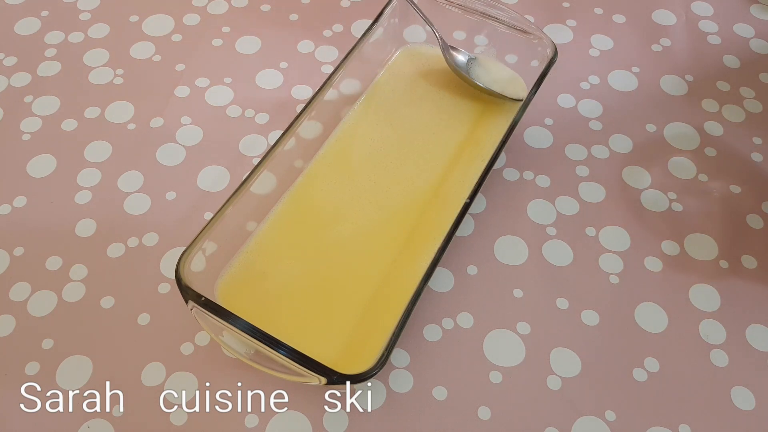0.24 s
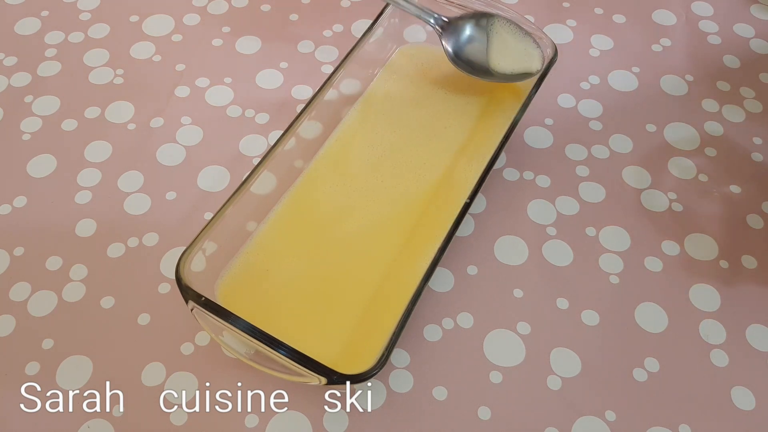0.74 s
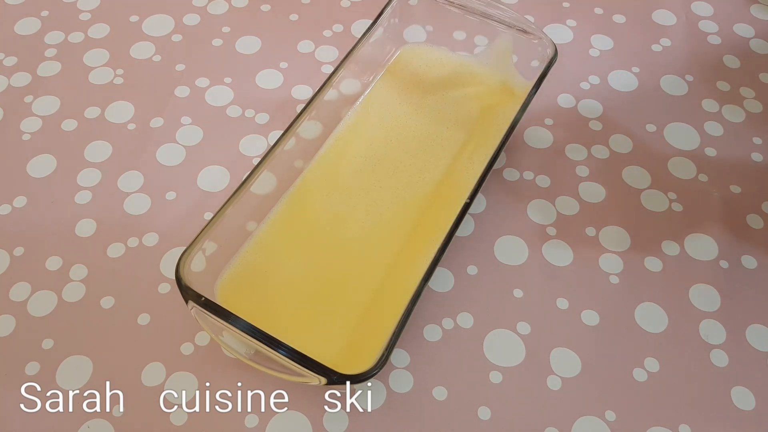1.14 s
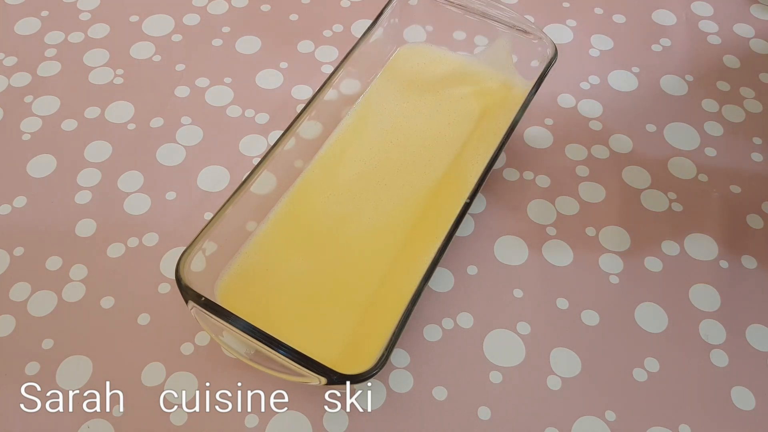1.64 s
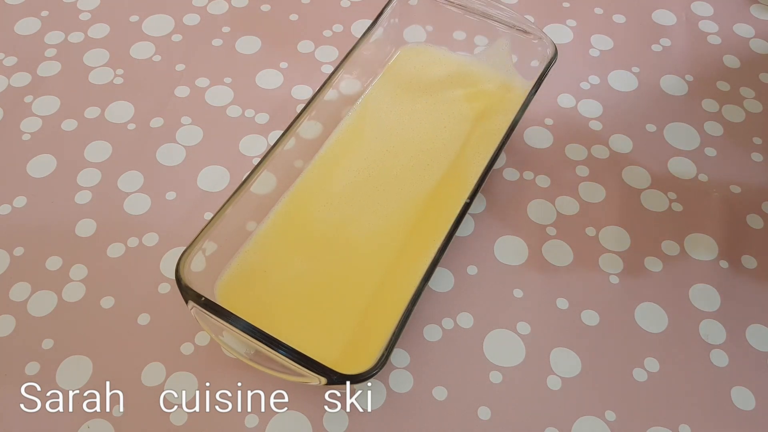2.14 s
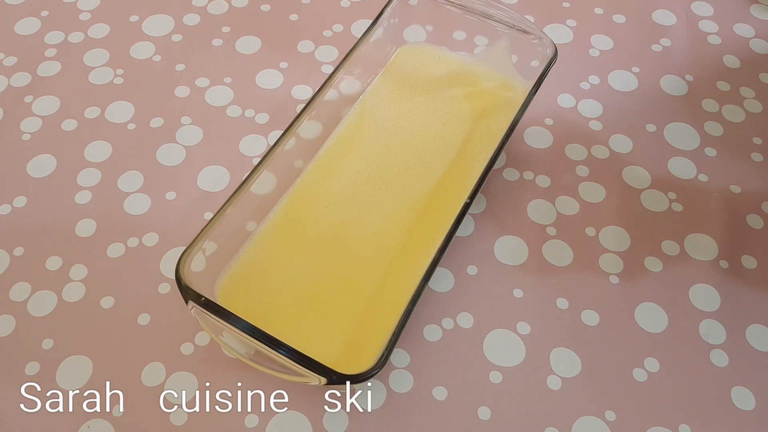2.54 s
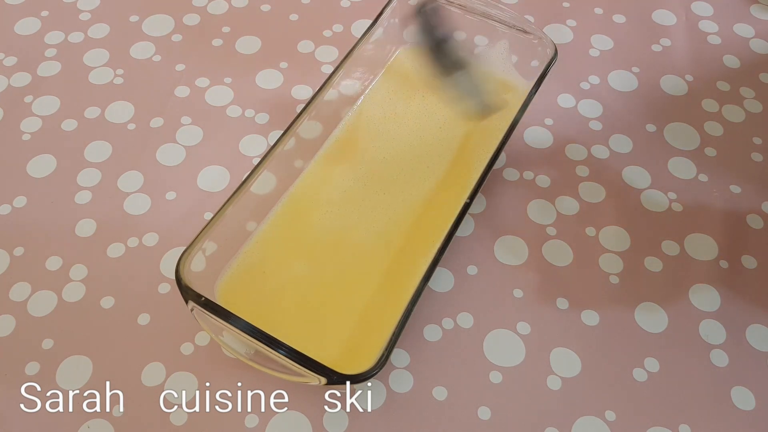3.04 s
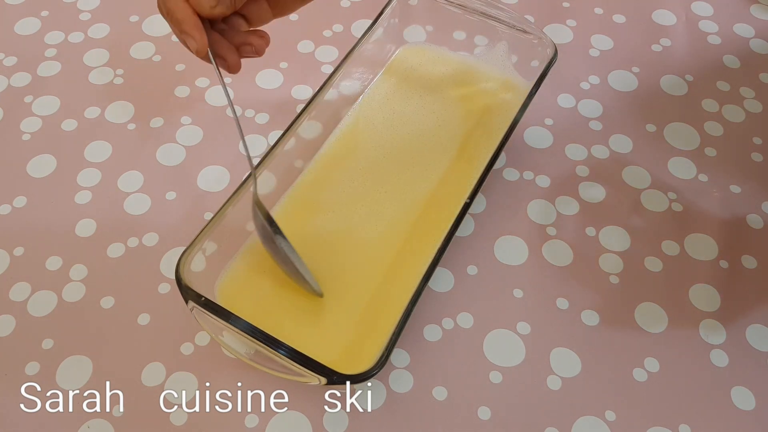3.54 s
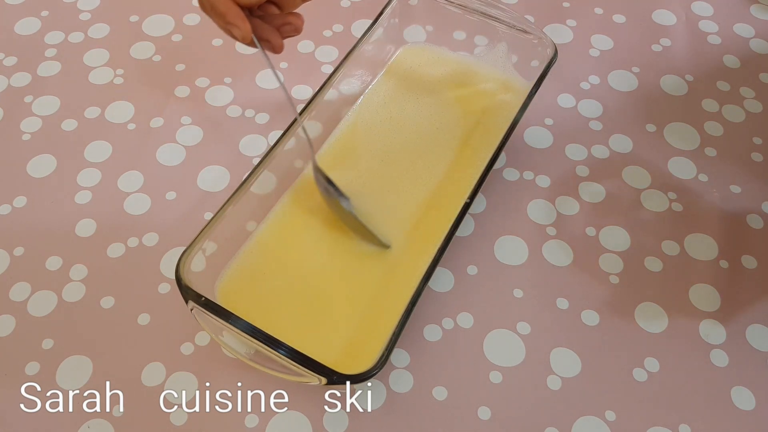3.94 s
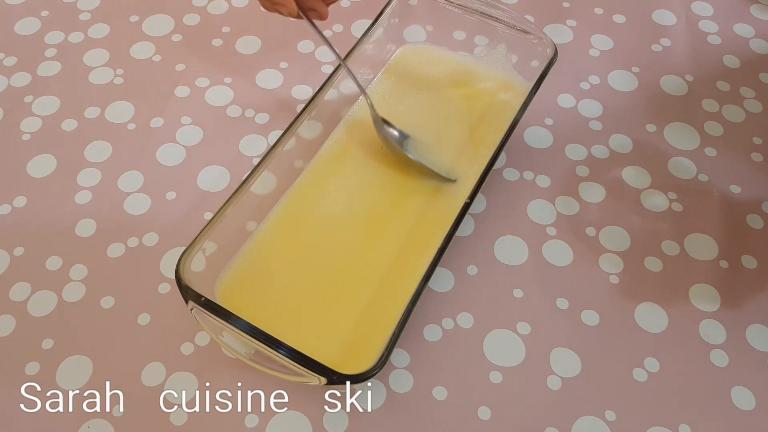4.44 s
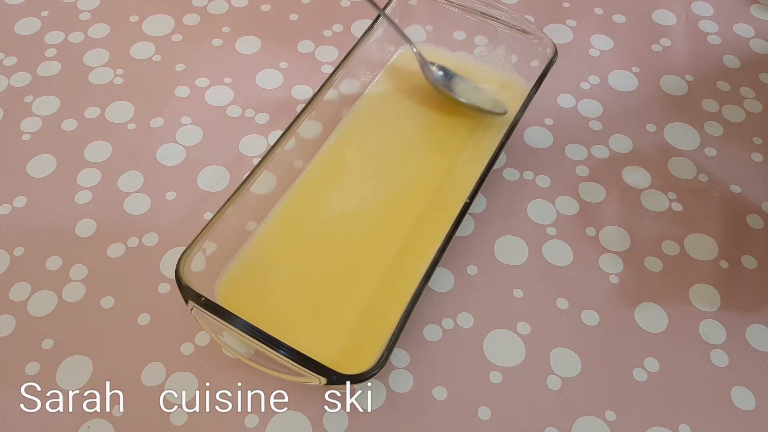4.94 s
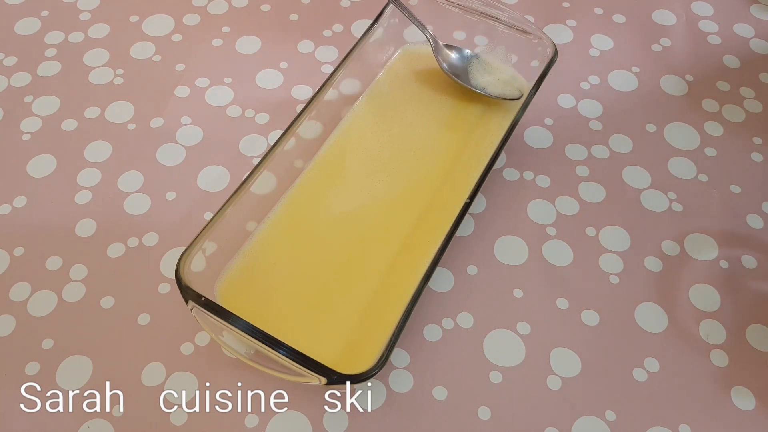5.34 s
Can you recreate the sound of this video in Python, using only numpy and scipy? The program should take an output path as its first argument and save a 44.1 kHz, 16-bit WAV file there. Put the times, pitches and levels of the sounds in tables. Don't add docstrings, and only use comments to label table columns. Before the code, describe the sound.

In a humming kitchen, short dull glass knocks, three bright ringing spoon taps, distant chirps, a faint scrape and final dish knocks.

```python
import sys
import numpy as np
from scipy import signal
from scipy.io import wavfile
from scipy.ndimage import uniform_filter1d

SR = 44100
rng = np.random.default_rng(int(sys.argv[2]) if len(sys.argv) > 2 else 0)


def put_to_file(sound):
    columns = np.atleast_2d(sound).T
    safe = np.clip(columns, -1, 1)
    whole_steps = np.round(safe * 32767)
    wavfile.write(sys.argv[1], SR, whole_steps.astype(np.int16))


def level_to_linear(level):
    exponent = np.asarray(level, float) / 20
    return 10 ** exponent


N = 245895

# t/s, blow level/dB, hardness/(dB per octave), crack level/dB, place (0 rim, 1 wall)
DISH_KNOCKS = [
    (0.0878, -20.5, -.5, -11, .05),
    (0.1428, -26.5, -2.5, -16, .05),
    (0.2798, -14.5, 3, -2.5, 0.61),
    (.344, -25.5, -1, -6, 0.34),
    (0.4264, -24, -3.5, -10, 0.32),
    (5.2545, -14.5, 0., -5, 0.56),
    (5.2778, -16, -.5, -6, 1),
    (5.5269, -12, -0.1, -7.5, 0.057),
]


def evened(x):
    return x / np.sqrt(np.mean(x ** 2) + 1e-20)


def read(points, hz):
    f, value = np.transpose(points)
    return np.interp(np.log(hz + 1), np.log(f + 1), value)


def add(mix, s, sound):
    part = mix[..., round(s * SR):][..., :sound.shape[-1]]
    part += sound[..., :part.shape[-1]]


def noise(gain, patchy_db, size=2048):
    # f/Hz, likeness (1 same, 0 unrelated)
    likeness = [(60, .98), (130, .97), (290, .86), (640, .4), (1400, -.1), (3000, 0), (15000, 0)]
    # f/Hz, left over right/dB
    balance = [(60, 5.5), (180, -0.5), (550, 4), (1650, 2.5), (4970, 1), (15000, 2.5)]
    frames, hz = 4 * N // size + 5, np.fft.rfftfreq(size, 1 / SR)
    a, b, c, d, patches = rng.standard_normal((frames, len(hz), 5)).T
    patches = uniform_filter1d(patches, size=12, axis=0)
    patches = evened(uniform_filter1d(patches, size=8, axis=1))
    same = np.clip(read(likeness, hz), -1, 1)[:, None]
    left = a + 1j * b
    right = same * left + np.sqrt(1 - same ** 2) * (c + 1j * d)
    right = right * level_to_linear(-read(balance, hz))[:, None]
    heard = gain(hz) * (hz < 14450)
    z = np.array([left, right]) * heard[:, None] * level_to_linear(patchy_db * patches)
    return evened(signal.istft(z, nperseg=size, noverlap=3 * size // 4)[1][:, :N])


def reverb(x, stretch, rise_s):
    # f/Hz, time to fall 60 dB/s
    kitchen = [(500, 0.74), (1500, 0.56), (4000, 0.49), (9000, 0.41), (15000, 0.11)]
    hz, t, z = signal.stft(rng.standard_normal((2, SR)), SR, nperseg=128)
    fall = level_to_linear(-60 * t / (stretch * read(kitchen, hz)[:, None]))
    tail = signal.istft(z * fall, SR, nperseg=128)[1][:, :SR]
    tail = tail * (1 - np.exp(-np.arange(SR) / (rise_s * SR)))
    return signal.fftconvolve(x[None], tail / np.linalg.norm(tail[0]), axes=1)[:, :N]


def wavering(hz, waver_hz):
    drift = evened(uniform_filter1d(rng.standard_normal(N), size=3000))
    return np.sqrt(2) * np.sin(2 * np.pi * np.cumsum(hz + waver_hz * drift) / SR)


def wander():
    return evened(uniform_filter1d(uniform_filter1d(rng.standard_normal(N), size=3000), size=3000))


def duck():
    start_s, depth_db = 2.473, -9.5
    fall_s, hold_s, recover_s = .25, .6, 0.97
    turns_s = start_s + np.cumsum([0, fall_s, hold_s, recover_s])
    return level_to_linear(depth_db * np.interp(np.arange(N) / SR, turns_s, [0, 1, 1, 0]))


def swells(rows, rest_db):
    t = np.arange(N) / SR
    bells = sum(level_to_linear(db) * np.exp(-((t - s) / width_s) ** 2) for s, width_s, db in rows)
    return level_to_linear(rest_db) * duck() + bells


def room_noise():
    # f/Hz, level/dB
    tone_colour = [(38, -23), (62, -11.5), (95, -6), (125, -8.5), (200, -2.5), (330, -9), (560, -7),
                   (680, -17.5), (850, -22.5), (1500, -28.5), (2500, -38.5), (6000, -42), (9000, -40.5),
                   (15500, -44)]
    return noise(lambda hz: level_to_linear(read(tone_colour, hz)), patchy_db=1, size=4096)


def appliance_hum():
    # f/Hz, level against the room noise/dB, waver/Hz, throb/dB
    hum_tones = [(154.9, -5, 3, 1), (202.8, -11, 2.9, 2), (226, -9.5, 3, 5), (295.4, -12, 3.2, 2.5),
                 (466.3, -14.5, 4, 0.5), (567, -20, 5, 6.5)]
    hum = np.zeros(N)
    for hz, db, waver_hz, throb_db in hum_tones:
        throb = evened(uniform_filter1d(rng.standard_normal(N), size=3000))
        hum += level_to_linear(db - 1 + throb_db * throb) * wavering(hz, waver_hz)
    return hum


def street_rumble():
    # centre t/s, half width/s, level/dB
    rumble_swells = [
        (.46, .05, -57),
        (.84, .12, -64),
        (1.33, .12, -57.5),
        (1.75, .15, -56.5),
        (2.1, .24, -46),
        (2.65, .1, -61),
        (3.2, .15, -65),
        (4.75, .45, -57),
        (5.4, .15, -59),
    ]
    # centre t/s, half width/s, level/dB
    mode_swells = [
        (.2, 0.18, -58),
        (.85, .1, -58.5),
        (1.6, .12, -55),
        (1.95, 0.11, -54),
        (3.35, .1, -62.5),
        (4., 0.21, -59),
        (4.95, .2, -58),
    ]
    rumble_db, rumble_throb_db, mode_db, mode_throb_db = -67, 3.5, -64, 2.
    mode = swells(mode_swells, mode_db) * level_to_linear(mode_throb_db * wander()) * wavering(94.5, 1.5)
    throb = level_to_linear(rumble_db + rumble_throb_db * wander()) * duck()
    rumble = (throb + swells(rumble_swells, -200)) * wavering(42.5, 1.5)
    return rumble + mode


def room_tone():
    tone_db, mains_db = -50.5, -58.5
    mains = level_to_linear(mains_db) * wavering(100, .1)
    humming = level_to_linear(tone_db) * appliance_hum() + mains
    steady = level_to_linear(tone_db) * room_noise() + humming * level_to_linear([[.9], [-.9]])
    return duck() * steady + street_rumble() * level_to_linear([[1.], [-1.]])


def glides():
    # t/s, length/s, start f/Hz, end f/Hz, level/dB
    chirps = [(0.019, 0.09, 4180, 3500, -67), (.51, 0.17, 5980, 6420, -61), (0.617, 0.15, 6210, 3780, -59),
              (0.799, 0.081, 5660, 4020, -63.5), (1.101, 0.12, 5970, 3330, -63.5),
              (1.484, 0.033, 2800, 3640, -57.5), (1.517, 0.031, 3637, 3620, -51),
              (1.62, 0.17, 3026, 2860, -68.5), (3.002, 0.24, 5160, 3990, -68.5),
              (3.569, .15, 8900, 7700, -73), (3.8, 0.034, 5550, 5630, -68), (3.879, .12, 5060, 3950, -68.5),
              (5.43, 0.074, 5000, 3350, -51.5)]
    # t/s, top f/Hz, knee f/Hz, drop level/dB, tail level/dB
    cheeps = [
        (1.877, 6250, 3896, -50, -50.5),
        (3.171, 6150, 3450, -57.5, -63),
        (3.54, 5670, 3400, -58, -58),
        (4.862, 5460, 3748, -52.5, -54),
    ]
    drop_s, tail_s, overlap_s, tail_end_hz = .038, .085, .006, 2880
    glide_bend, drop_bend, tail_bend = 1.1, 1.8, 1.2
    rows = [(*row, glide_bend) for row in chirps]
    for s, top_hz, knee_hz, drop_db, tail_db in cheeps:
        tail_at_s = s + drop_s - overlap_s
        rows.append((s, drop_s, top_hz, knee_hz, drop_db, drop_bend))
        rows.append((tail_at_s, tail_s, knee_hz, tail_end_hz, tail_db, tail_bend))
    return sorted(rows)


def sparrows():
    # centre t/s, half width/s, level/dB
    flurries = [
        (.5, .5, -60.5),
        (1.1, .2, -73),
        (2.75, .2, -70),
        (3.45, .3, -69),
        (4.5, 0.19, -66.5),
        (5.6, 0.37, -54.5),
    ]
    dry = np.zeros(N)
    for s, length_s, start_hz, end_hz, db, bend in glides():
        u = np.linspace(0, 1, round(length_s * SR))
        burr = .045 * evened(uniform_filter1d(rng.standard_normal(SR // 3), size=40))[:len(u)]
        pitch_hz = (end_hz + (start_hz - end_hz) * (1 - u) ** bend) * (1 + burr)
        turns = np.cumsum(pitch_hz) / SR
        voice = np.sin(2 * np.pi * turns) + level_to_linear(-22.5) * np.sin(4 * np.pi * turns)
        add(dry, s, level_to_linear(db + 2.3 * u) * voice * signal.windows.tukey(len(u), .3))
    blur = noise(lambda hz: np.exp(-(np.log2((hz + 1) / 4100) / .45) ** 2), patchy_db=2, size=1024)
    yard = level_to_linear([[3.], [1.5]]) * reverb(dry, 1.5, .012)
    return level_to_linear(-14) * dry + yard + swells(flurries, rest_db=-71) * blur


def bumps(peaks, hz):
    return sum(level_to_linear(db) / (1 + (2 * (hz - f) / width) ** 2) for f, width, db in peaks)


def stroke_gain(row):
    s, attack_s, hold_s, db, fall_db = row
    t = np.arange(N) / SR - s
    rise = 25 * np.clip(1 - t / attack_s, 0, 5)
    return level_to_linear(db - rise - fall_db * np.maximum(t - attack_s - hold_s, 0))


def metal_scrape():
    # t/s, attack/s, hold/s, peak level/dB, release/(dB per s)
    stroke = (4.27, .11, .15, -56.5, 75)
    # f/Hz, width/Hz, level/dB
    ring_peaks = [(2590, 30, -5), (3240, 39, -5), (3720, 32, -2), (3924, 22.4, 4.5), (4314, 30, -1),
                  (5140, 28, -3), (5900, 22, -7), (6020, 18, 7), (6560, 36, 0), (7130, 43, -16),
                  (7840, 21, -1), (7700, 20, -7), (7960, 26, -16), (8920, 20, -1), (8920, 28, -20),
                  (9650, 28, -1.5), (10200, 24, -1), (10800, 48, -24), (11100, 22, 1.5), (11600, 36, -7),
                  (12100, 20, -4), (12400, 29, -17.5), (12900, 32, -11), (13440, 180, -22),
                  (13700, 21, -24), (14200, 35, -20)]
    # f/Hz, level/dB
    hiss = [(590, -39), (1000, -5), (1220, -6.5), (2490, 7.5), (2940, -12), (3800, -8.5), (5550, -5),
            (6490, -17), (7250, -6), (7750, -9), (8380, -9), (11300, -18), (14300, -24)]
    ringing = noise(lambda hz: level_to_linear(read(hiss, hz) - 9.) + bumps(ring_peaks, hz), patchy_db=1)
    return level_to_linear(4.0) * stroke_gain(stroke) * ringing


def spoon_slide():
    # t/s, attack/s, hold/s, peak level/dB, release/(dB per s)
    stroke = (5.11, .125, .005, -54, 360)
    # f/Hz, level/dB
    hiss = [(600, -8), (1200, -4), (3000, -2.5), (7000, -7), (12000, -14), (14500, -18)]
    return stroke_gain(stroke) * noise(lambda hz: level_to_linear(read(hiss, hz)), patchy_db=1, size=512)


def table_thuds():
    thud_db, thud_hz, thud_t60_s = -33, 450, .09
    out, t = np.zeros(N), np.arange(SR // 8) / SR
    note = np.sin(2 * np.pi * thud_hz * t) * np.minimum(t / 0.0043, 1)
    for s, db, _, _, place in DISH_KNOCKS:
        strength_db = thud_db + 2 * (db + 12) - 10 * place
        add(out, s, level_to_linear(strength_db - 60 * t / thud_t60_s) * note)
    return out


def crack_filter(crack, hard_db):
    hz = np.fft.rfftfreq(1024, 1 / SR)
    gain_db = read(crack, hz) + hard_db * np.log2((hz + 50) / 2500)
    log_gain = np.log(level_to_linear(np.maximum(gain_db, -80)))
    full = np.r_[log_gain, log_gain[-2:0:-1]]
    return np.fft.ifft(np.exp(full - 1j * signal.hilbert(full).imag)).real[:512]


def knock(row, modes, crack, left_late_s, ring_lead_s, longest_s, crack_db, clatter):
    s, db, pan_db, hard_db, snap_db, place = row
    lead_s, widest_db = .001, 7
    late_s = np.array([[max(left_late_s, 0)], [max(-left_late_s, 0)]])
    t = np.arange(SR // 4) / SR - late_s - lead_s
    rung = t + np.array([[ring_lead_s], [0]])
    ring = np.zeros(t.shape)
    for hz, (rim_db, wall_db, t60) in zip(*modes):
        mode_db = rim_db + np.clip(place, 0, 1) * (wall_db - rim_db)
        place_db = 1.5 * rng.standard_normal((2, 1))
        tilt_db = hard_db * np.log2(hz / 2500)
        fall_db = 60 * abs(t) / min(t60, longest_s)
        ring += level_to_linear(mode_db + place_db + tilt_db - fall_db) * np.sin(2 * np.pi * hz * rung)
    colour = crack_filter(crack, hard_db)
    fade = sum(level_to_linear(level_db - 60 * abs(t) / t60) for level_db, t60 in clatter) * (t > 0)
    pulse = np.sinc(t * SR) * np.exp(-(t * SR / 6) ** 2)
    contact = fade * rng.standard_normal(t.shape) - pulse
    snap = signal.oaconvolve(contact, colour[None])[:, :t.shape[1]]
    sound = ring * (t > 0) / 2 + level_to_linear(crack_db + snap_db) * snap / abs(colour).max()
    sides = level_to_linear(db + np.array([[.5], [-.5]]) * np.clip(pan_db, -widest_db, widest_db))
    return s - lead_s, sides * sound


def cup_taps():
    # t/s, blow level/dB, bounce delay/s, bounce level/dB
    taps = [
        (2.2261, -18, .0259, -24.5),
        (2.3698, -18.5, .0248, -21.5),
        (2.5333, -20, .0237, -28),
    ]
    pitches = [1816, 1878, 1920, 1950, 2573, 2880, 3397, 3697, 4802, 4914, 5108, 5274, 5417, 6110, 8070,
               8452, 8640, 8778, 9900, 10290, 10430, 10750, 12500, 13400, 13660, 13900, 14180]
    # level/dB, time to fall 60 dB/s
    rings = [(-29.5, .1), (-7, 0.25), (-6.5, 0.2), (-23, .15), (-20.5, .04), (-20, .04), (-11.5, .03),
             (-20, .04), (-14.5, .1), (-16, 0.062), (-15, .08), (-10.5, .12), (-15, 0.066), (-15.5, .03),
             (-23.5, .08), (-21, .08), (-17, .08), (-6, .09), (-21.5, .08), (-18.5, 0.035), (-10, 0.086),
             (-19, 0.14), (-23, .05), (-17, .09), (-16, .11), (-17.5, .11), (-18.5, .11)]
    # f/Hz, level/dB
    crack = [(400, -16), (1400, -26), (2300, -6.5), (3450, -1), (4500, -11), (5000, -.5), (6300, -7),
             (7000, -17.5), (7500, -35.5), (8700, 3.5), (9500, -24), (10400, -16), (11500, -44.5),
             (15500, -45.5)]
    pan_db, tap_hard_db, tap_crack_db = -1.5, 0.3, 2.5
    bounce_hard_db, bounce_crack_db, bounce_crack_slope = -1.5, -9., 1.
    usual_bounce_db = np.mean(taps, axis=0)[3]
    contacts = []
    for s, db, after_s, bounce_db in taps:
        snap_db = bounce_crack_db + bounce_crack_slope * (bounce_db - usual_bounce_db)
        contacts.append((s, db, pan_db, tap_hard_db, tap_crack_db, 0))
        contacts.append((s + after_s, bounce_db, pan_db, bounce_hard_db, snap_db, 1))
    modes = [(db, db + 4.7 * (hz < 2000), t60) for hz, (db, t60) in zip(pitches, rings)]
    cup = np.zeros((2, N))
    for row in contacts:
        add(cup, *knock(row, (pitches, modes), crack, left_late_s=.0003, ring_lead_s=.00024, longest_s=.3,
                        crack_db=13.5, clatter=[(-27, .008), (-29, .06)]))
    return cup


def dish_knocks():
    # t/s, blow level/dB, hardness/(dB per octave), crack level/dB
    ticks = [
        (.83, -54.5, -4, -15),
        (.93, -54, 9, 1),
        (1.468, -67, 6.5, 3),
    ]
    pitches = [872, 903, 1305, 1547, 1564, 1928, 1955, 2006, 2043, 2172, 2212, 2308, 2343, 2376, 2447, 2635,
               3090, 3133, 3340, 3555, 4221, 5023, 5555, 10250, 14090]
    # level struck at the rim/dB, level struck on the wall/dB, time to fall 60 dB/s
    rings = [(-23, -25, 0.27), (-16.5, -16, 0.25), (-21, -16.5, .06), (-6, -11.5, 0.2), (-3, -7.5, .11),
             (-19.5, -19, .1), (-17, -13, 0.14), (-13, -12.5, 0.18), (-14.5, -6, 0.13), (-22.5, -9, 0.1001),
             (-20.5, -26, 0.075), (-20.5, -15, 0.29), (-9, 1, 0.1), (-18, -17, 0.14), (-27.5, -18.5, .08),
             (-28.5, -19.5, 0.0602), (-13.5, -13.5, 0.091), (-18.5, -17, 0.1), (-28.5, -15.5, .06),
             (-23, -9, .06), (-11.5, -17, 0.078), (-18.5, -12.5, 0.06), (-21.5, -17, .06),
             (-37, -20.5, .04), (-40, -35, 0.1)]
    # f/Hz, level/dB
    crack = [(400, -18), (900, -18), (1400, -6.5), (2200, 8.5), (3400, 5.5), (5000, -3.5), (6500, -2.5),
             (8000, -18), (11000, -23), (15400, -54)]
    rim_pan_db, wall_pan_db = 7., -2.5
    contacts = [(s, db, rim_pan_db + wall_pan_db * place, hard_db, snap_db, place)
                for s, db, hard_db, snap_db, place in DISH_KNOCKS]
    contacts += [(s, db, rim_pan_db, hard_db, snap_db, 0) for s, db, hard_db, snap_db in ticks]
    dish = np.zeros((2, N))
    for row in contacts:
        add(dish, *knock(row, (pitches, rings), crack, left_late_s=0, ring_lead_s=0, longest_s=.15,
                         crack_db=5.0, clatter=[(-15, .01), (-19.5, .09)]))
    return dish


def knocks_in_kitchen():
    # delay/ms, level/dB
    echoes = [
        (2.1, -15),
        (3.4, -14),
        (6.2, -12),
        (8.3, -15),
        (11.5, -14),
        (16., -17),
    ]
    dish, cup = dish_knocks(), cup_taps()
    direct = dish + cup
    out = direct + level_to_linear([[-8], [-9]]) * reverb(dish.mean(0), 1.0, 0.0084)
    out += level_to_linear([[-3.], [-3.5]]) * reverb(cup.mean(0), 0.84, .004)
    out += level_to_linear(-22.5) * reverb(direct.mean(0), 2.4, 0.035)
    for k, (ms, db) in enumerate(echoes):
        add(out[k % 2], ms / 1000, level_to_linear(db) * direct[1 - k % 2])
    return signal.sosfilt(signal.butter(6, [760, 14900], "bandpass", fs=SR, output="sos"), out)


def scene():
    background = room_tone() + metal_scrape() + spoon_slide() + sparrows()
    return background + table_thuds() + knocks_in_kitchen() * duck() ** .3


def low_pass(x):
    return signal.sosfilt(signal.butter(12, 15580, fs=SR, output="sos"), x)


def record(dry):
    return low_pass(dry)


dry = scene()
out = record(dry)
put_to_file(out)
```